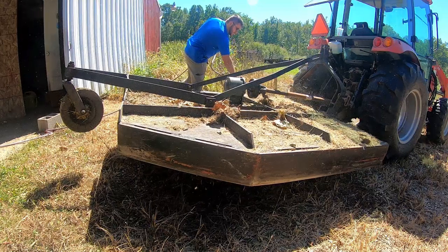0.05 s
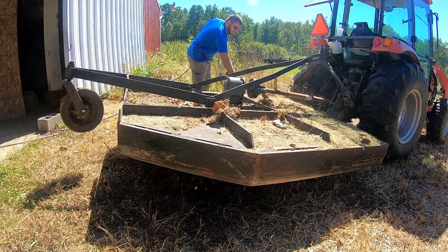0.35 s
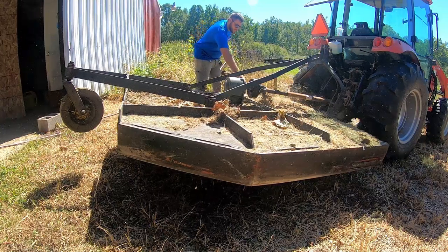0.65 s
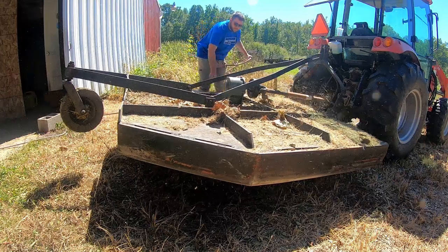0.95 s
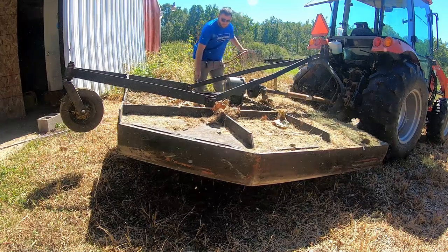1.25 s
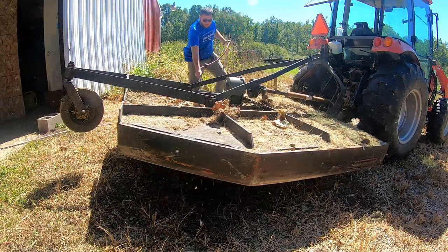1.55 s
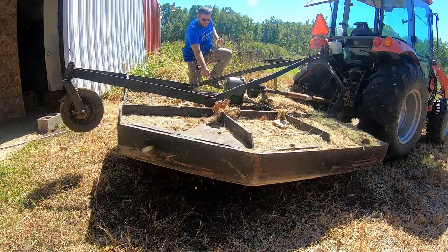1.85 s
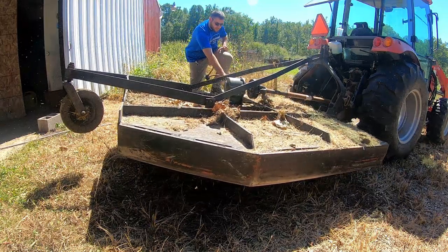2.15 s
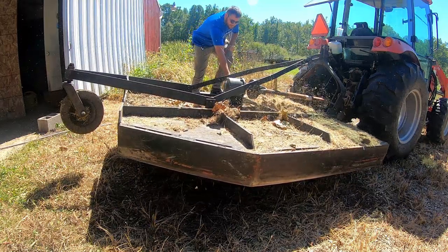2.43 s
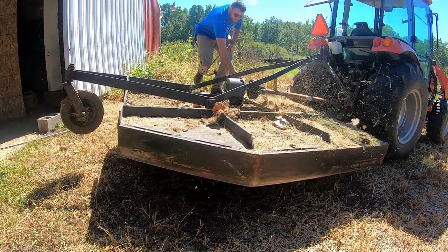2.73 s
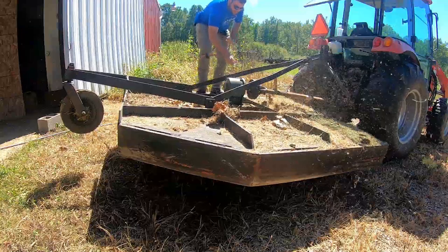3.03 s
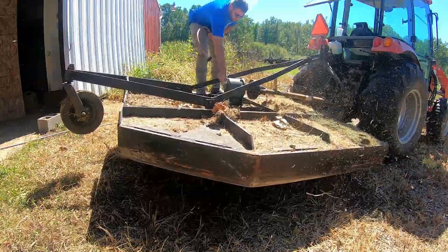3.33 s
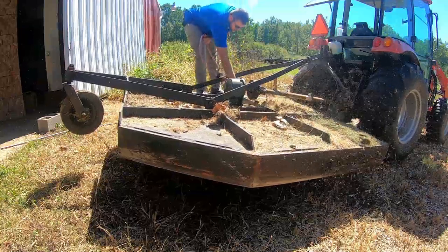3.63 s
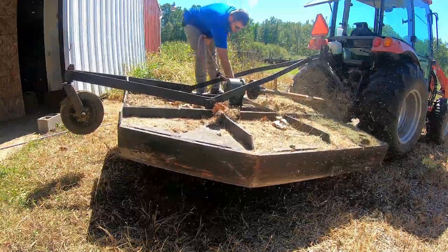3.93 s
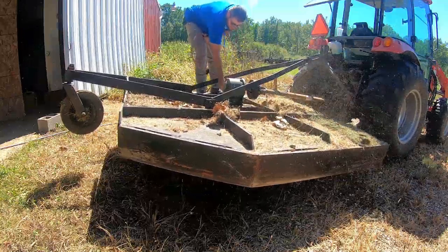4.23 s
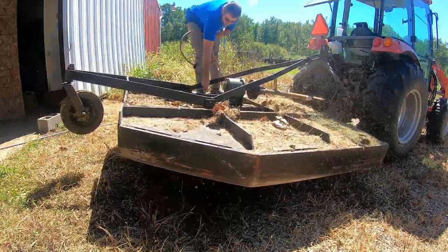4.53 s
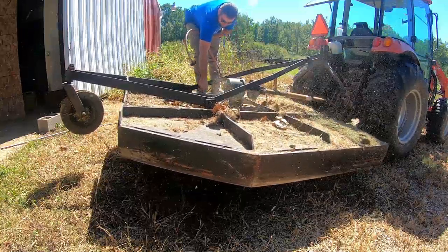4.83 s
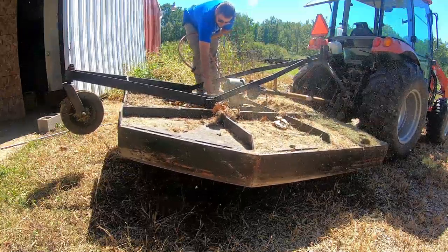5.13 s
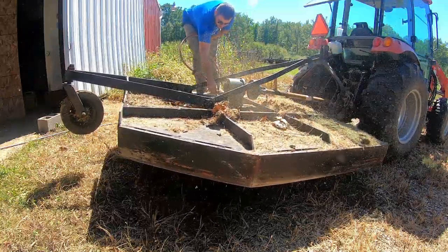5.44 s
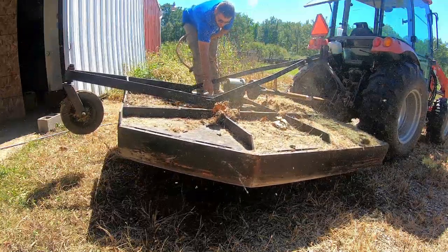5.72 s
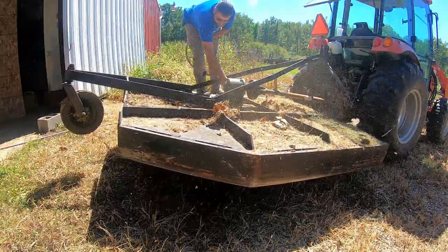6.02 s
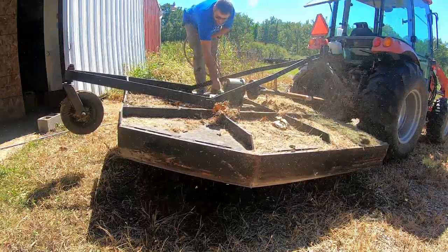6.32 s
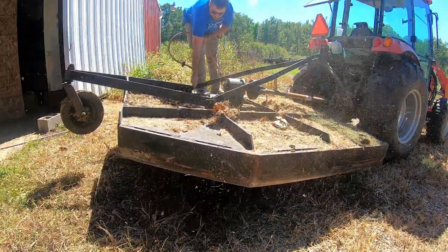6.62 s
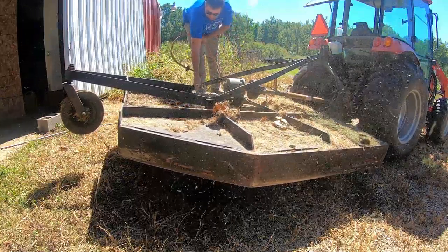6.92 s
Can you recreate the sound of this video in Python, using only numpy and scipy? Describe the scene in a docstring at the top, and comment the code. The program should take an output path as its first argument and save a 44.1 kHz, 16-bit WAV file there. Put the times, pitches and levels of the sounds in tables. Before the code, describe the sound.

A compressed-air gun blows dry grass off a steel mower deck a few metres away. Three bright hissing blasts come with short gaps, each longer than the last. The hiss wavers and swells into brief roars as the jet sweeps over ribs and corners, while chaff ticks lightly on the steel. Boots softly scuff and thump in the pauses. The yard adds a short echo over a faint field rush.

```python
"""Three long hissing blasts of compressed air blow dry grass off a steel mower deck, a few metres away.
The free jet hisses; whenever it sweeps over a rib or into a corner it roars, and chaff patters on the steel.
Between blasts, boots scuff the grass and thump the deck; near the end, debris knocks on it once.
A shed wall and a tractor return a short echo over the faint rush of a field."""
import sys
import numpy as np
from scipy import signal
from scipy.fft import rfft, irfft, next_fast_len
from scipy.io import wavfile
from scipy.ndimage import uniform_filter1d, map_coordinates

SR = 44100
rng = np.random.default_rng(int(sys.argv[2]) if len(sys.argv) > 2 else 0)


def dump_mix(stems):
    """Bounce the given channels to the path in sys.argv[1] as a 16-bit WAV at rate SR."""
    frames = np.atleast_2d(stems).T  # one column per channel
    limited = np.clip(frames, -1, 1)  # hard clip at full scale
    pcm = np.round(limited * 32767).astype(np.int16)
    wavfile.write(sys.argv[1], SR, pcm)


N = 316197

# Trigger pulls. Each row: valve opens in seconds, valve shuts in seconds, nozzle sizzle in dB.
TRIGGER_PULLS = [(-.1, .926, 4.5), (1.489, 3.036, 0), (3.306, 7.4, 0)]
# Nozzle aim. Each row: time in seconds, relative level in dB, tilt in dB/octave, plate splash in dB.
AIM = [(0, -27, -4, -4), (.2, -30.5, -1.5, -1.5), (.36, -27, 0, 0), (.45, -30, -2.5, -2.5),
       (.51, -26.5, 0, 2), (.64, -28.5, -1.5, -2.5), (.78, -26.5, 1, 0), (.92, -28.5, -1.5, -1.5),
       (1.5, -23, 3, 0), (1.93, -23.5, 1, -0.5), (2.1, -23.5, 1.5, 2.5), (2.24, -25.5, 0.5, -1),
       (2.41, -24, 0, 1.5), (2.78, -24, 0.5, -0.5), (2.92, -28.5, -0.5, -2), (3.31, -23.5, 0, -2.5),
       (3.55, -25.5, -2.5, -3.5), (3.88, -23.5, -.5, 3), (4.02, -25.5, 1, -2), (4.14, -26, 3, 1),
       (4.32, -26, -3, -1), (4.52, -22.5, -2.5, 5), (4.79, -25, -4, -0.5), (4.87, -27.5, 1, 1),
       (5.05, -25, -0.5, 3.5), (5.2, -24.5, -3.5, 1), (5.42, -25.5, -3, 3), (5.62, -22.5, -1.5, -2.5),
       (5.78, -25, -2.5, 1.5), (5.94, -23.5, 1.5, 5.5), (6.06, -27.5, -5.5, -2), (6.27, -22.5, 2, -4),
       (6.45, -26, -1, -2), (6.64, -26, -6.5, -5.5), (6.7, -27, -1.5, 1), (6.78, -29, -3, -3),
       (7.16, -26, -3, -1)]
# Jet roaring in a corner or clump; the last row is a short knock of debris on the deck.
# Each row: middle in seconds, length in seconds, low and high band edge in Hz,
# glide to either side of the middle in octaves, relative level in dB.
ROARS_AND_KNOCK = [(0.42, 0.024, 130, 580, 0.24, -42), (0.473, 0.052, 680, 900, 0.16, -33.5),
                   (0.522, 0.071, 1500, 4200, -0.78, -22), (0.566, .11, 710, 1800, 0.035, -26.5),
                   (0.679, 0.084, 308, 1390, -1, -34), (0.874, .045, 200, 860, 0, -31.5),
                   (1.73, 0.055, 312, 990, 0.012, -23), (1.829, 0.3, 217, 740, .2, -29.5),
                   (2.139, 0.32, 118, 540, -0.027, -35.5), (2.464, .065, 179, 1000, 0.2, -26.5),
                   (2.632, 0.084, 181, 1030, -0.16, -25), (2.807, .085, 192, 1050, 0.034, -23.5),
                   (3.381, 0.18, 131, 1140, -0.064, -34), (3.476, .16, 266, 1350, 0.19, -22.5),
                   (3.567, 0.047, 1650, 3000, .2, -21), (3.901, 0.039, 5030, 6200, -0.34, -19),
                   (4.59, 0.07, 3900, 4770, 0.24, -25), (4.709, 0.098, 920, 1760, -0.012, -24),
                   (4.93, 0.033, 4300, 5060, 0.4, -21.5), (5.386, 0.024, 710, 1230, -0.054, -29),
                   (5.492, .11, 765, 1220, 0, -27), (5.592, .065, 834, 1270, 0.36, -25.5),
                   (5.647, 0.041, 2050, 3900, -0.11, -21), (5.725, .12, 784, 1250, -0.58, -28),
                   (6.021, 0.079, 830, 3260, -1.1, -21.5), (6.115, .09, 374, 1670, -.3, -23),
                   (6.466, 0.096, 950, 3880, 0.51, -21), (6.606, .03, 2320, 4130, -0.15, -17.5),
                   (6.675, 0.055, 280, 1650, -0.15, -24), (6.938, .013, 263, 3000, -0.033, -24.5)]
# Jet across a rib. Each row: middle in seconds, length in seconds, relative level in dB.
RIB_PASSES = [(3.669, 0.086, -26), (3.904, 0.045, -30), (4.08, 0.047, -22), (4.246, 0.079, -22.5),
              (4.404, .047, -25), (4.519, .08, -27.5), (4.942, 0.059, -25.5)]


def amp(db):
    """Decibels to gain."""
    return 10 ** (np.asarray(db) / 20)


def unit(x):
    """Scale to rms 1."""
    return x / np.sqrt(np.mean(x ** 2) + 1e-20)


def clock():
    """Sample times in seconds."""
    return np.arange(N) / SR


def along(points, hz):
    """(Hz, value) points read on a log axis."""
    points_hz, values = np.transpose(points)
    return np.interp(np.log(hz + 1), np.log(points_hz), values)


def curves(rows, t):
    """Each column after the time, read at times t."""
    times_s, *columns = np.transpose(rows)
    return [np.interp(t, times_s, column) for column in columns]


def wobble(knots_per_s, t):
    """Smooth random curve."""
    return map_coordinates(rng.standard_normal(2048), [t * knots_per_s], mode="mirror")


def filtered(x, response):
    """Filter x by a function of frequency in Hz."""
    n = x.shape[-1]
    padded = next_fast_len(n + 4096, real=True)
    return irfft(rfft(x, padded) * response(np.fft.rfftfreq(padded, 1 / SR)), padded)[..., :n]


def noise(response, size):
    """Coloured stereo noise of rms 1: near mono in the bass, diffuse in the treble."""
    # Stereo width. Each row: frequency in Hz, side minus mid in dB.
    width = [(40, -11), (130, -11), (300, -16), (700, -12.5), (1000, -7.5), (1800, -5.5), (2400, -10.5),
             (4000, -15), (5500, -5.5), (7000, -6.5), (8100, 3), (9500, -3), (11300, -1), (13000, -3)]

    def mid_and_side(hz):
        angle = np.arctan(amp(along(width, hz)))
        return response(hz) * np.array([np.cos(angle), np.sin(angle)])
    mid, side = filtered(rng.standard_normal((2, size)), mid_and_side)
    return unit(np.array([mid + side, mid - side]))


def band(hz, low_hz, high_hz):
    """Band-pass gain: soft lower edge, steep upper edge."""
    hz = hz + 1
    return ((1 + (low_hz / hz) ** 5) * (1 + (hz / high_hz) ** 9)) ** -.5


def field_rush(level_db=-56):
    """Faint steady rush of a summer field."""
    # Each row: frequency in Hz, relative density in dB.
    spectrum = [(25, -38), (55, -11.5), (110, -15.5), (180, -7.5), (250, -8), (330, -18), (500, -23),
                (790, -17), (1000, -19), (3000, -19), (5000, -24), (7000, -17.5), (9500, -24), (11000, -35),
                (15500, -44)]
    return amp(level_db) * noise(lambda hz: amp(along(spectrum, hz)), N)


def yard_echo(x, wet_db=-12, delay_s=.008):
    """Shed wall, tractor and trees scatter a short tail, drawn anew every half second."""
    # Each row: frequency in Hz, t60 in seconds.
    decay = [(100, 0.38), (800, 0.42), (4000, 0.45), (8000, 0.39), (14000, 0.34)]
    hop = SR // 2
    out = np.zeros((2, N + SR))
    for middle in range(0, N + hop, hop):
        span = np.flatnonzero(abs(np.arange(N) - middle) < hop)
        piece = x[:, span] * np.cos(np.pi / 2 * (span - middle) / hop)
        hz, t, bins = signal.stft(noise(np.ones_like, SR * 2 // 5), SR, nperseg=256)
        tail = signal.istft(bins * amp(-60 * t / along(decay, hz)[:, None]), SR, nperseg=256)[1]
        echo = signal.fftconvolve(piece, tail / np.linalg.norm(tail[0]), axes=1)
        out[:, span[0] + round(delay_s * SR):][:, :echo.shape[1]] += echo
    return amp(wet_db) * out[:, :N]


def boots(gain_db=-3, attack_s=0.0016, scatter_db=2.2):
    """Soft soles thump the plate and scuff through dry grass."""
    # Each row: start in seconds, relative level in dB.
    steps = [(1.484, -48), (3.221, -35), (3.237, -31.5), (3.285, -42)]
    # Plate under a boot. Each row: frequency in Hz, relative level in dB, t60 in seconds.
    plate_modes = [(56, -16, .3), (84, -5, 0.71), (114, -15, .3), (150, 5, 0.073), (187, -7, 0.093),
                   (284, -2.5, 0.099)]
    # Each row: start in seconds, level in dB, band centre in Hz, t60 in seconds.
    scuffs = [(1.233, -44.5, 5200, 0.1), (1.296, -48, 2190, 0.052), (1.376, -53.5, 597, 0.15)]
    out = np.zeros((2, N))
    t = np.arange(SR // 2) / SR
    onset = 1 - np.exp(-t / attack_s)
    for start_s, db in steps:
        ring = sum(amp(mode_db + rng.normal(0, scatter_db) - 60 * t / t60_s) * np.sin(2 * np.pi * hz * t)
                   for hz, mode_db, t60_s in plate_modes)
        out[:, round(start_s * SR):][:, :len(t)] += amp(db + gain_db) * ring * onset
    for start_s, db, centre_hz, t60_s in scuffs:
        rustle = noise(lambda hz: band(hz, centre_hz / 1.5, centre_hz * 1.5), len(t))
        out[:, round(start_s * SR):][:, :len(t)] += amp(db - 60 * t / t60_s) * rustle * onset
    return out


def deck_ring(x):
    """The steel deck and its pockets lift or cut a few bands."""
    # Each row: centre in Hz, width in Hz, lift in dB.
    resonances = [(80, 12, 1.5), (105, 5.5, 2), (235, 26, -0.5), (306.6, 33, 4.5), (349, 69, 3),
                  (401, 22, 5), (504, 13, 1.5), (594, 27, 2.5), (790, 25, 2.5), (893, 50, 1.5),
                  (1250, 36, 3.5), (1567, 33, 4.5), (1936, 45, -6), (2400, 9.5, 2.5), (3110, 61, 1),
                  (3600, 540, 1.5)]

    def response(hz):
        return 1 + sum((amp(db) - 1) * 1j * hz * width_hz / (mode_hz ** 2 - hz ** 2 + 1j * hz * width_hz)
                       for mode_hz, width_hz, db in resonances)
    return filtered(x, response)


def chaff(count=2600, median_hz=4800, cycles=5, level_db=-47, scatter_db=3):
    """Bits of dry grass and grit tick against the steel."""
    t = np.arange(256) / SR
    starts = rng.integers(0, N - len(t), (count, 1))
    hz = np.clip(median_hz * np.exp(0.38 * rng.standard_normal((count, 1))), 800, 11000)
    strength = amp(scatter_db * np.minimum(rng.exponential(size=(count, 1)), 4))
    age = t * hz / cycles
    ticks = strength * np.sin(2 * np.pi * hz * t) * age * np.exp(-4 * age)
    samples = starts + np.arange(len(t))
    return amp(level_db) * unit(np.bincount(samples.ravel(), ticks.ravel(), N))


def plate_rumble(gain_db=-26, build_s=0.11, wide_hz=200, fall_db_per_octave=9, flutter_db=3.5):
    """Air dwelling in a wide corner shakes the plate: the longer and lower the roar, the stronger."""
    t = clock()
    power = np.zeros(N)
    for middle_s, length_s, low_hz, _, _, db in ROARS_AND_KNOCK:
        drive = amp(db - fall_db_per_octave * np.log2(low_hz / wide_hz)) * length_s / build_s
        power += drive ** 2 * np.exp(-(2 * (t - middle_s) / (0.85 * length_s)) ** 2)
    envelope = amp(gain_db + flutter_db * wobble(25, t)) * np.sqrt(power)
    return envelope * noise(lambda hz: band(hz, low_hz=70, high_hz=140), N)


def plate_wash(tilt_coupling=0.33, flutter_db=1.5):
    """The spent jet spreads over the plate in slower, lumpy eddies."""
    # Each row: time in seconds, level relative to the jet in dB.
    share = [(0, -16), (.3, -24.5), (.56, -11.5), (.92, -20.5), (1.5, -20), (1.62, -15), (2.3, -16.5),
             (3.03, -18), (3.4, -17.5), (4.0, -18), (4.45, -14), (4.77, -9.5), (4.87, -22), (5.0, -15.5),
             (5.88, -20.5), (6.1, -10.5), (6.35, -15), (6.65, -10.5), (7.16, -11.5)]
    # Each row: frequency in Hz, relative density in dB.
    spectrum = [(25, -46), (55, -18), (75, -11.5), (128, -19.5), (170, -0.5), (350, -1), (950, 3.5),
                (1600, -8), (4000, -11)]
    t = clock()
    level_db, tilt, _ = curves(AIM, t)
    share_db, = curves(share, t)
    db = level_db + share_db + tilt_coupling * tilt + flutter_db * wobble(70, t)
    return amp(db) * noise(lambda hz: amp(along(spectrum, hz)), N)


def plate_bounces(x, depth_db=3, long_waves_hz=900):
    """Bounces off plate and ribs add and cancel: hollow colours that drift at random."""
    hz, _, bins = signal.stft(x, SR, nperseg=1024)
    patches = rng.standard_normal(bins.shape[1:])
    for size, axis in [(3, 0), (2, 0), (9, 1), (5, 1)]:  # smooth over frequency, then time
        patches = uniform_filter1d(patches, size=size, axis=axis)
    swing_db = depth_db * hz / (hz + long_waves_hz)  # long waves barely notice small movements
    gain = unit(amp(swing_db[:, None] * unit(patches)))
    return signal.istft(bins * gain, SR, nperseg=1024)[1][:, :N]


def pocket_response(hz, scatter_db=2):
    """Air across the hollows between ribs rings them, short of a whistle, differently each time."""
    # Each row: centre in Hz, half-width in Hz, mean lift in dB.
    hollows = [(715, 54, 1), (904, 69, 2), (1260, 35, 1.5), (1680, 70, -2.5), (2690, 260, 1),
               (3400, 160, 1)]
    return 1 + sum((amp(db + rng.normal(0, scatter_db)) - 1) / (1 + ((hz - centre_hz) / width_hz) ** 2)
                   for centre_hz, width_hz, db in hollows)


def roar(middle_s, length_s, low_hz, high_hz, glide_octaves, flutter_db=1, fringe_db=-17):
    """Swell of eddies off an edge in the jet; a very short one is a knock. Returns indices, sound."""
    first = max(round((middle_s - 2 * length_s) * SR), 0)
    last = min(round((middle_s + 2 * length_s) * SR), N)
    span = np.arange(first, last)
    t = span / SR
    offset = 2 * (t - middle_s) / length_s
    core = np.exp(-.5 * abs(offset) ** 3.4)
    fringe = amp(fringe_db) * np.exp(-.5 * (offset / 1.87) ** 2)  # touches earlier, leaves later
    # Eddy speed changes with distance to the edge.
    travel = np.cumsum(2 ** (glide_octaves * np.clip(offset / 2, -1, 1)))
    eddies = noise(lambda hz: band(hz, low_hz, high_hz) * pocket_response(hz), int(travel[-1]) + 2)
    gliding = np.array([map_coordinates(channel, [travel]) for channel in eddies])
    return span, amp(flutter_db * wobble(110, t)) * np.maximum(core, fringe) * gliding


def roars_and_knock(gain_db=-1, rib_band_hz=(516, 4640)):
    """Corners roar high near the nozzle, low in slow air; thin ribs roar broadly; debris knocks once."""
    out = np.zeros((2, N))
    for middle_s, length_s, low_hz, high_hz, glide_octaves, db in ROARS_AND_KNOCK:
        span, sound = roar(middle_s, length_s, low_hz, high_hz, glide_octaves)
        out[:, span] += amp(db + gain_db) * sound
    for middle_s, length_s, db in RIB_PASSES:
        span, sound = roar(middle_s, length_s, *rib_band_hz, glide_octaves=0)
        out[:, span] += amp(db + gain_db) * sound
    return out


def hiss_dip_db(rib_db=-3, other_db=-0.5):
    """An edge in the jet takes away some hiss; it also dips at the knock."""
    t = clock()

    def cover(events):
        return sum(np.exp(-np.minimum((2 * (t - middle_s) / length_s) ** 2, 20))
                   for middle_s, length_s, *_ in events)
    return rib_db * cover(RIB_PASSES) + other_db * cover(ROARS_AND_KNOCK)


def valve(opening_s=0.035, closing_s=0.085):
    """Air flow, 0 to 1, as the trigger is squeezed and released."""
    t = clock()
    ramp = lambda u: np.sin(np.pi / 2 * np.clip(u + .5, 0, 1)) ** 2
    return sum(ramp((t - on_s) / opening_s) * ramp((off_s - t) / closing_s)
               for on_s, off_s, _ in TRIGGER_PULLS)


def jet_hiss(gain_db=0.59, pivot_hz=6000, sizzle_hz=7600, splash_hz=4000,
             flutter_db=1, tremor_db=.5, tremor_db_per_octave=0.95):
    """Fine nozzle turbulence: coloured by the aim, trembling with the hand, dipping behind edges."""
    # Each row: frequency in Hz, relative density in dB.
    spectrum = [(150, -31), (400, -32), (800, -18), (1500, -12.5), (2400, -5), (3400, -1), (4600, -1.5),
                (6000, 0.6), (7100, 2), (8400, -2.5), (9900, -5), (11400, -16.5), (13000, -12),
                (15800, -27.5)]
    hz, t, bins = signal.stft(noise(lambda hz: amp(along(spectrum, hz)), N), SR, nperseg=512)
    level_db, tilt, splash_db = curves(AIM, t)
    sizzle_db, = curves([(s, db) for on_s, off_s, db in TRIGGER_PULLS for s in (on_s, off_s)], t)
    octaves = np.clip(np.log2((hz + 1) / pivot_hz), -1.5, 2)[:, None]

    def peak(centre_hz, width_octaves):
        return np.exp(-(np.log2((hz + 1) / centre_hz) / width_octaves) ** 2)[:, None]
    colour_db = (tilt + tremor_db_per_octave * wobble(18, t)) * octaves
    colour_db += sizzle_db * peak(sizzle_hz, 0.17) + splash_db * peak(splash_hz, 0.56)
    shake_db = flutter_db * wobble(32, t) + tremor_db * wobble(13, t)
    bins = bins * amp(gain_db + level_db + colour_db + shake_db)
    return amp(hiss_dip_db()) * signal.istft(bins, SR, nperseg=512)[1][:, :N]


def scene():
    """The valve gates all air-driven sound; boots, echo and field are added."""
    jet = plate_bounces(jet_hiss() + roars_and_knock())
    air = valve() * (jet + plate_rumble() + plate_wash() + chaff())
    near = deck_ring(air) + boots()
    return near + yard_echo(near) + field_rush()


def record(dry, top_hz=15800):
    """Two microphone ports of unequal colour, then a hard band limit."""
    # Each row: frequency in Hz, left minus right in dB.
    balance = [(100, 0.1), (500, -1.5), (870, -3.5), (1050, -1), (1280, -1.5), (1750, 0.5), (2300, -.8),
               (4800, -0.3), (7000, -3.5), (8100, -1.5), (9900, -3.5), (11700, 2), (15000, 1.3)]
    ports = filtered(dry, lambda hz: amp(along(balance, hz) * np.array([[.5], [-.5]])))
    return filtered(ports, lambda hz: hz < top_hz)


dry = scene()
out = record(dry)
dump_mix(out)
```